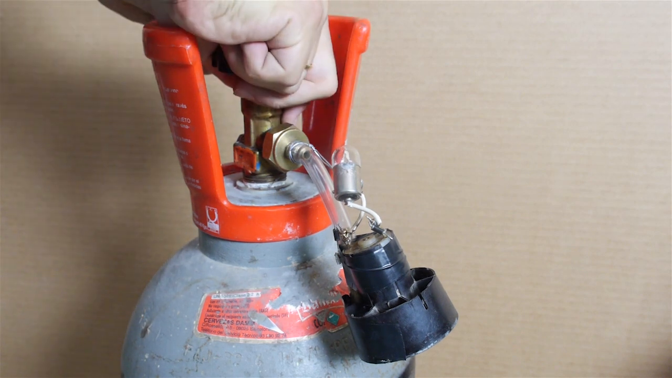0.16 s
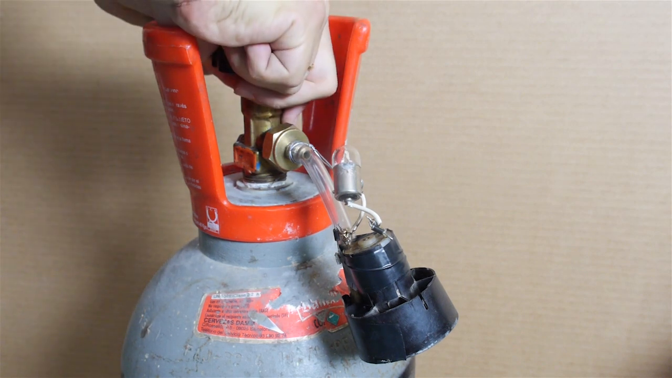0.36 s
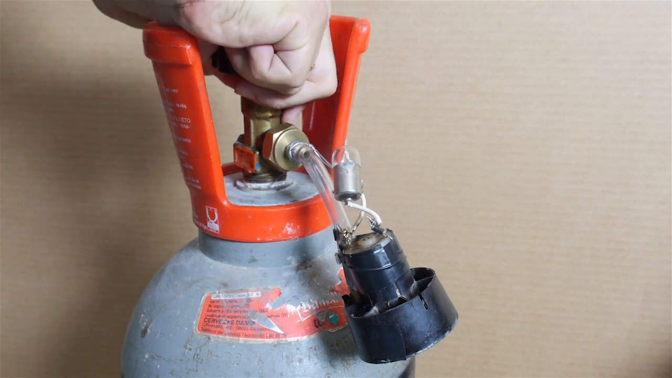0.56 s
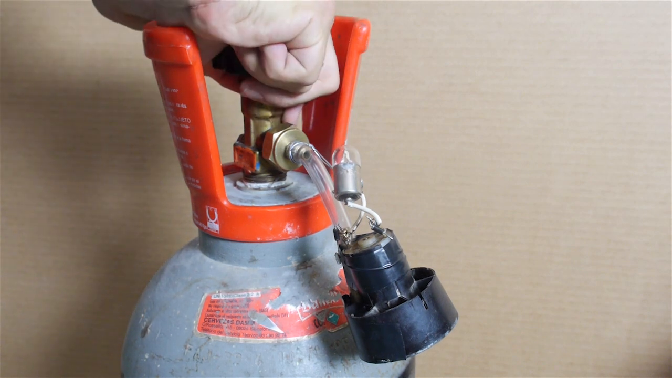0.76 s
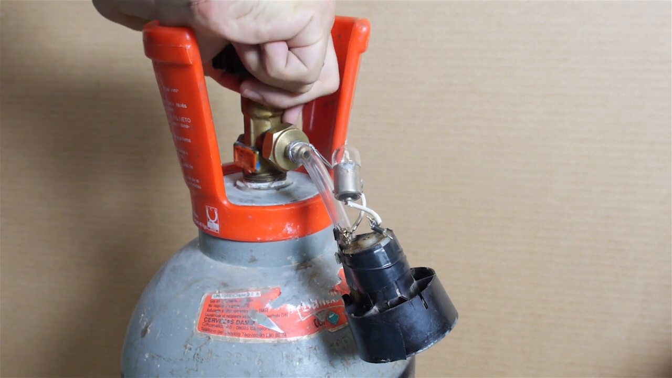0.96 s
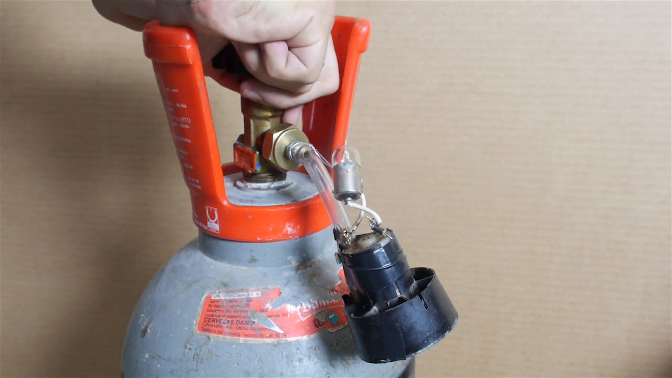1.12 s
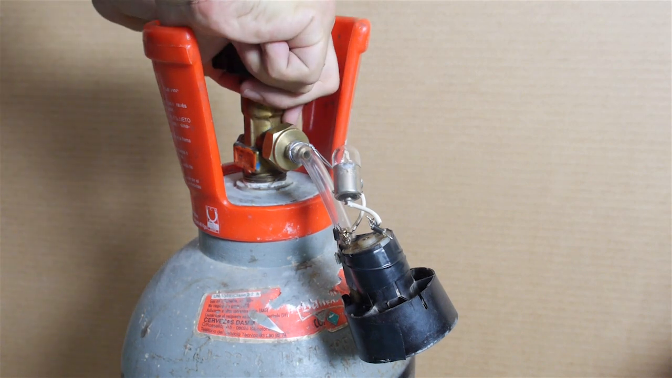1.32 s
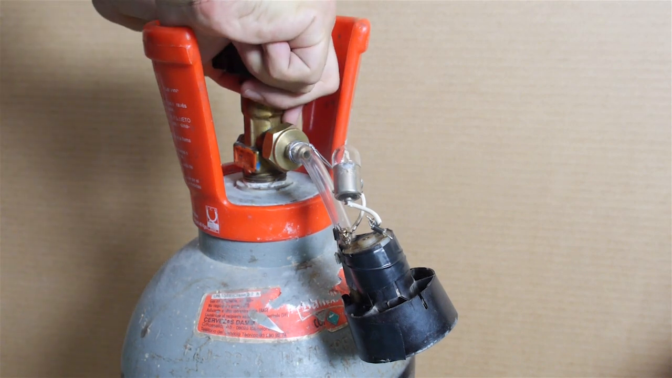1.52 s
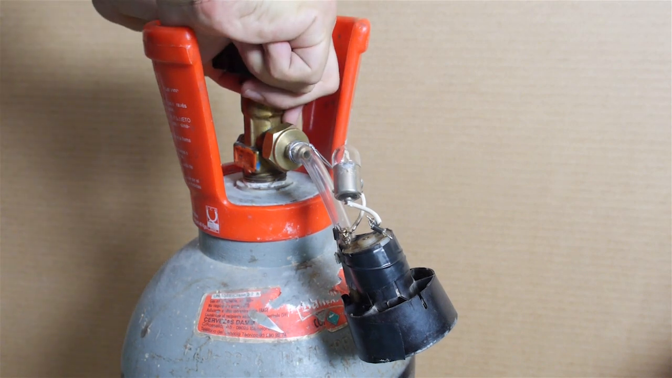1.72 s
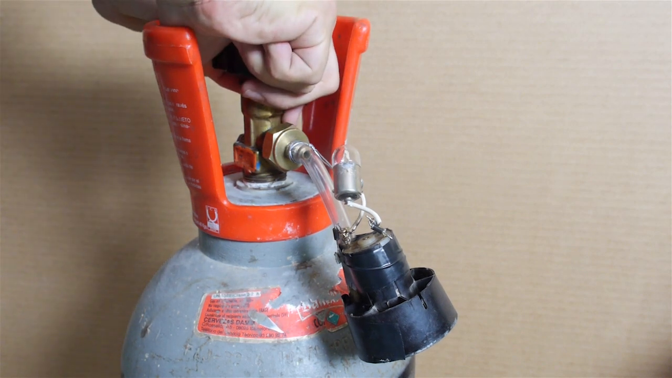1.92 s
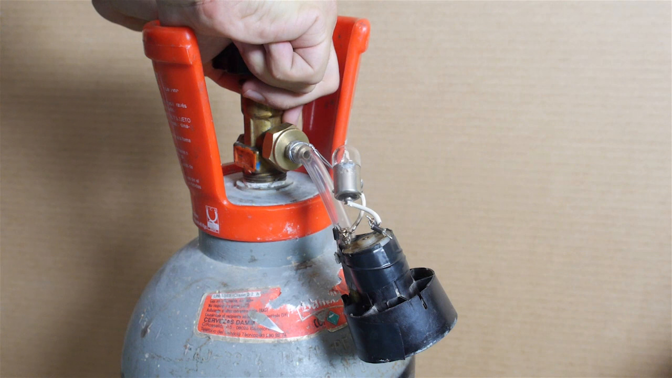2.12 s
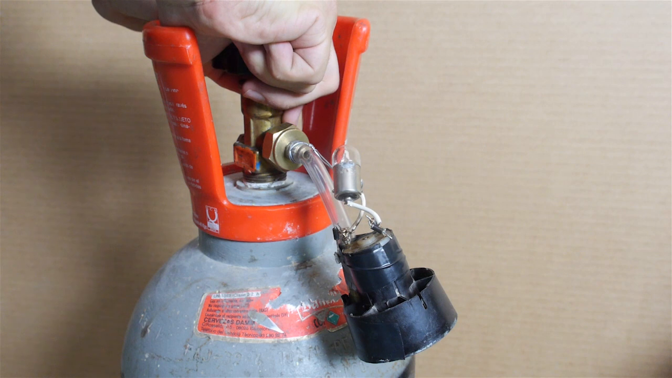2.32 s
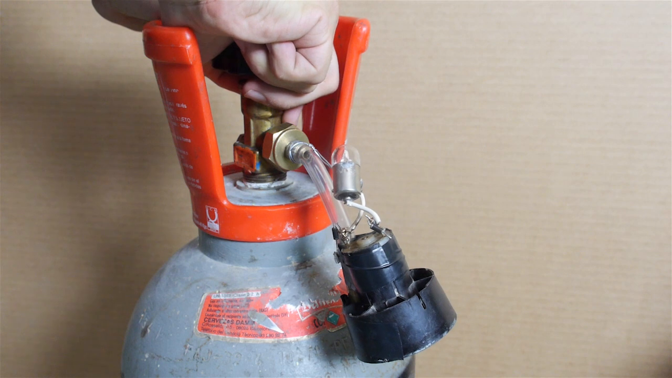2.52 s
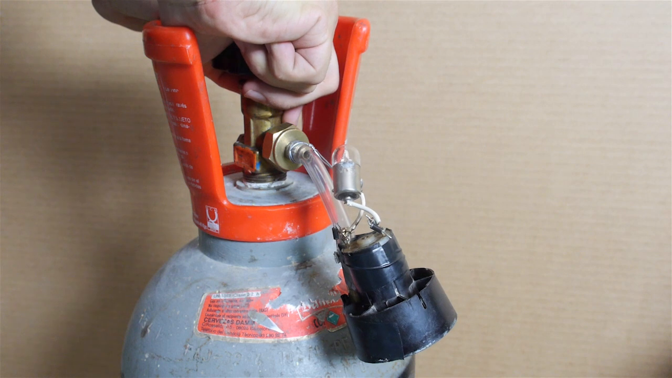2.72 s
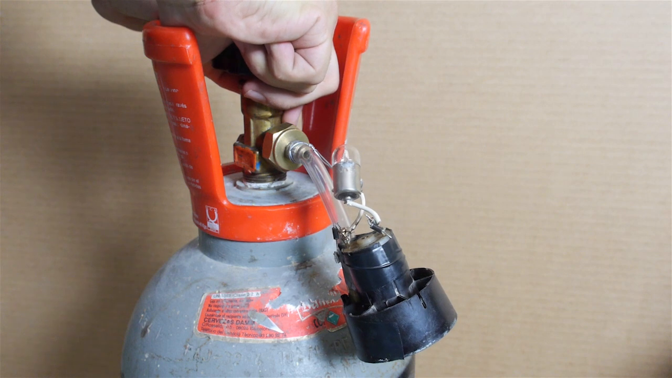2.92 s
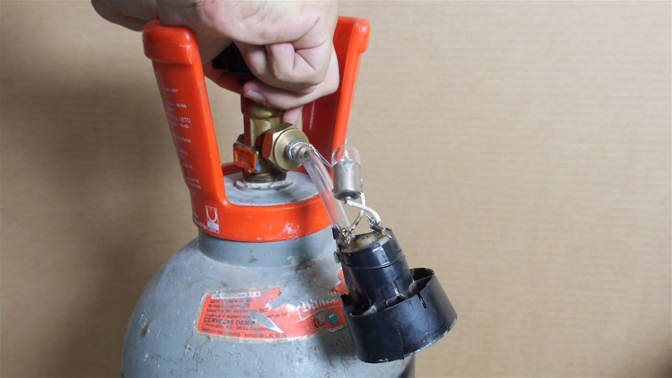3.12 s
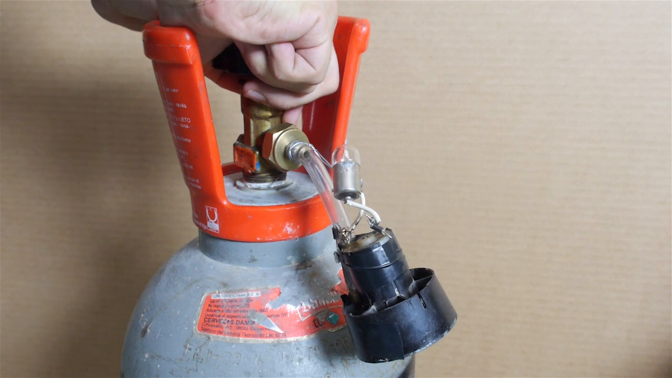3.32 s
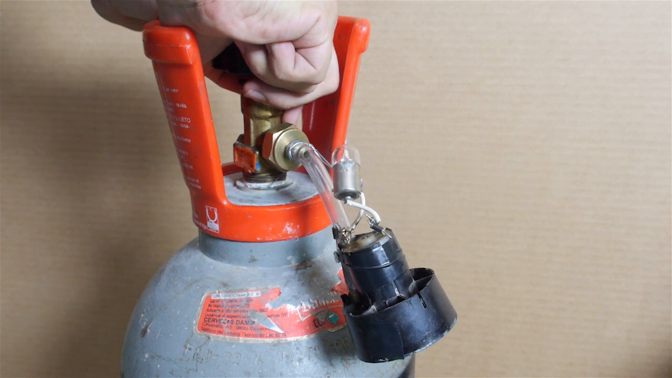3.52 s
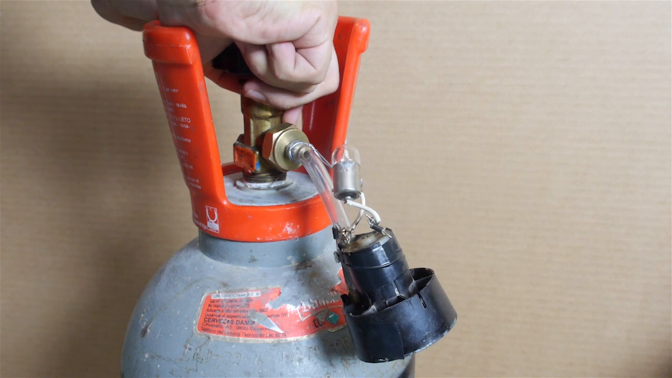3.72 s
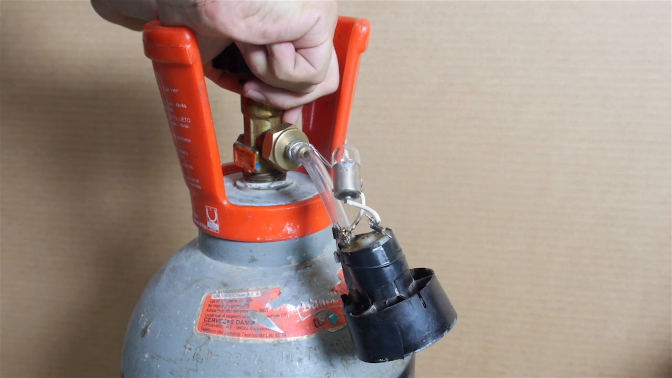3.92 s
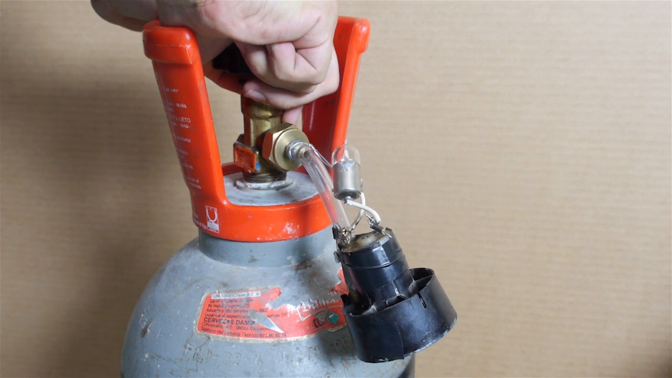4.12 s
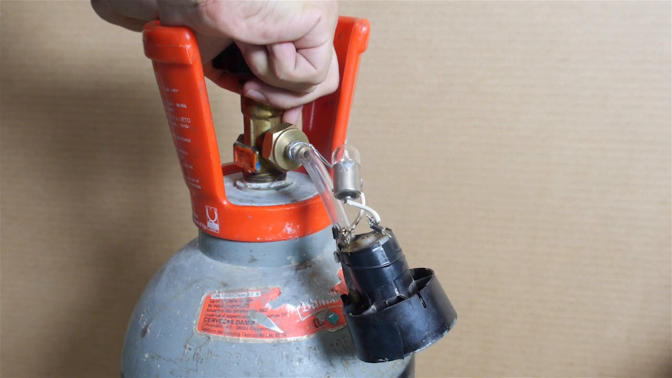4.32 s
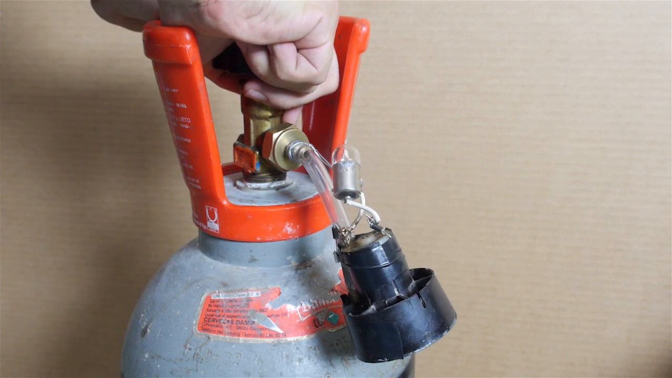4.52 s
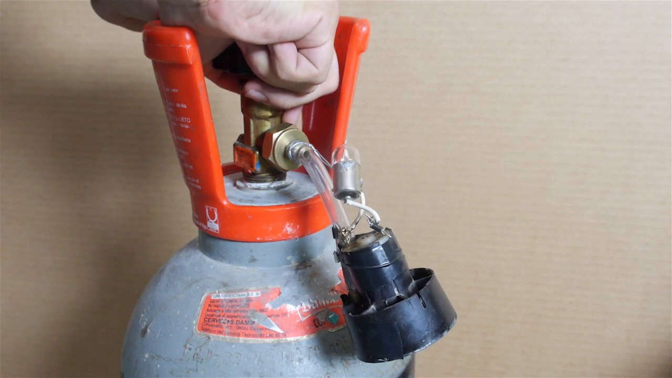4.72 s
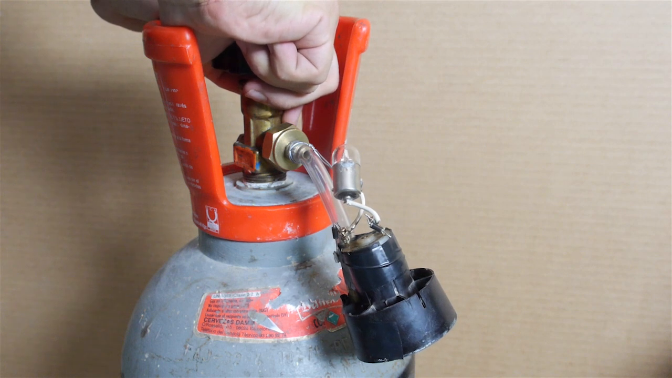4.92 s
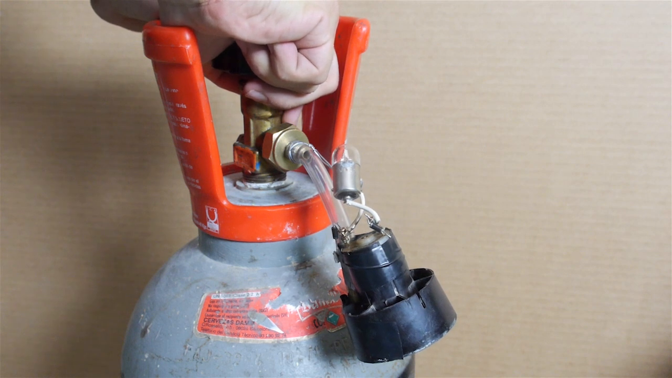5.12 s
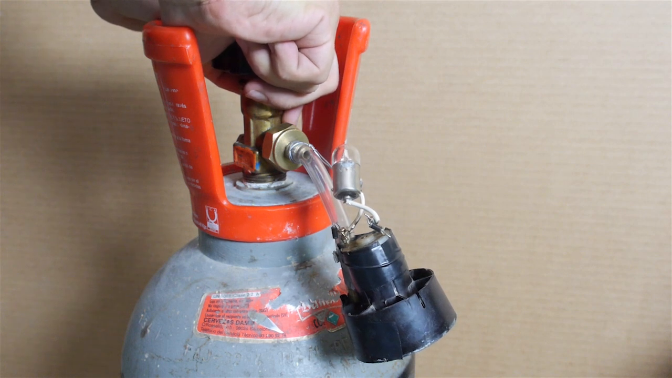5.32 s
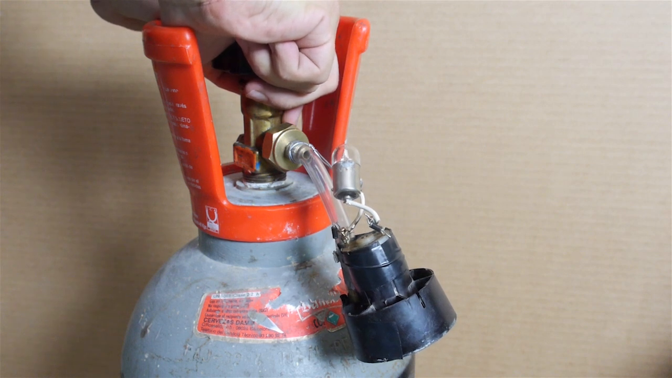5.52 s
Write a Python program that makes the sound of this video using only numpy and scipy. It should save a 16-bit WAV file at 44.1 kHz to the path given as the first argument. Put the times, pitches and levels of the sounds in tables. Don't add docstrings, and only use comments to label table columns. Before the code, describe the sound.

Faint valve ticks in a quiet humming room, then compressed air hisses louder in steps and a small turbine spins up into a climbing whine.

```python
import sys
import numpy as np
from scipy import signal
from scipy.fft import rfft, irfft, next_fast_len
from scipy.io import wavfile
from scipy.ndimage import uniform_filter1d, map_coordinates

SR = 44100
rng = np.random.default_rng(int(sys.argv[2]) if len(sys.argv) > 2 else 0)


def transcribe(u):
    v = np.clip(np.atleast_2d(u).T, -1, 1)
    q = np.round(v * 32767).astype(np.int16)
    wavfile.write(sys.argv[1], SR, q)


def ratio(d):
    e = np.asarray(d, float) / 20
    return 10 ** e


N = 245637

# start in seconds, jet level gained in dB, turn length in seconds.
VALVE_TURNS = [
    (0.79, 4.5, 0.037),
    (1.03, 10.5, 0.057),
    (1.258, 6.5, 0.074),
    (1.538, 8, 0.17),
    (1.723, 4.5, 0.87),
]
# centre in Hz, width in Hz, level in dB.
DUCT_SPINNING_MODES = [(1490, 130, -13), (2190, 410, -10.5), (2844, 690, -5.5), (3467, 480, -6),
                       (3815, 150, -5), (4000, 58, 0.5), (4200, 150, 2.5), (4476, 100, -3.5),
                       (4900, 430, 0), (5440, 63, -20), (5657, 160, -4), (6324, 560, 2), (7110, 160, -1),
                       (7740, 480, -1), (8210, 380, -7.5), (8690, 260, -4), (9380, 240, -5.5),
                       (9870, 700, -4.5), (10580, 220, -12), (11400, 260, -8.5), (12200, 300, -14),
                       (13000, 350, -24), (13800, 170, -35), (16100, 850, -7)]
# centre in Hz, width in Hz, level in dB.
DUCT_STILL_MODES = [(1440, 180, -12.5), (2015, 73, -12.5), (2360, 900, -13.5), (3090, 190, -9.5),
                    (3540, 100, -8.5), (3860, 120, -4), (4055, 30, 1), (4250, 120, -3), (4455, 190, 0),
                    (4860, 130, -2), (4993, 150, -2), (5400, 81, -5), (5730, 370, -7.5), (6150, 270, -2.5),
                    (6690, 400, -5.5), (7020, 120, -7), (7270, 200, -13), (7560, 130, -2.5),
                    (8110, 360, -1), (8650, 210, -3.5), (9260, 91, -2.5), (9700, 300, -9.5),
                    (10200, 270, -5.5), (10900, 130, -6), (11500, 120, -17), (12100, 190, -28),
                    (13500, 530, -36), (16200, 1000, -32)]
# centre in Hz, width in Hz, depth from 0 to 1.
WALL_NOTCHES = [(1758, 160, 0.5), (2446, 170, 0.34), (3067, 160, 0.7), (4560, 40, .8), (5510, 31, 0.7)]
# frequency in Hz, density in dB per Hz.
WASH_SPECTRUM = [(88, -67), (150, -32), (249, -6.5), (374, -11), (481, -6), (1140, 0.5), (1300, -25),
                 (1690, -43), (2860, -120)]
# frequency in Hz, side over mid in dB.
JET_SPREAD = [(60, -33), (110, -28), (200, -23), (380, -15), (700, -9), (1290, -21), (2380, -20),
              (4400, -16), (8120, -11), (15000, -10)]
# start in seconds, blade rate gained in Hz, time constant in seconds.
ROTOR_SURGES = [
    (2.653, 169.85, 0.256),
    (4.456, 600, 4.61),
    (5.263, 60, 0.41),
]
# multiple, level in dB.
BLADE_ORDERS = [(1, 0.0), (2, 2.1), (3, 4.9), (4, 5.8), (5, 4.2), (6, 3.0), (7, 1.4), (8, 1.6), (9, 1.0),
                (10, -1.2), (11, -2.6), (12, -5.2)]
UNEVEN_BLADES_DB = [
    -16,
    -18,
    -19.5,
]
# centre in Hz, width in Hz, level in dB.
HOUSING_MODES = [(156, 58, -8.5), (253, 65, -0.1), (524, 61, -8.0), (613, 111, -3.5), (800, 150, -1.3),
                 (1171, 144, -5.2), (1535, 95, 4.0), (1429, 149, 4.7), (1031, 120, 0.7), (2073, 221, 7.4),
                 (2702, 227, 4.9), (3314, 192, 3.3), (4723, 363, 17.8)]
# centre in Hz, width in Hz, depth from 0 to 1.
FLOOR_NOTCH = (328, 16, .5)
# time in seconds, peak in dB, frequency in Hz.
WHEEL_TICKS = [
    (0.041, -58, 2360),
    (0.05, -46, 1130),
    (0.083, -54, 1170),
    (0.255, -51, 1130),
    (0.288, -57, 931),
    (0.314, -61, 953),
    (0.346, -63, 1110),
    (0.437, -55, 961),
]
# frequency in Hz, rms level in dB.
HUM_TONES = [(177.6, -97), (253.0, -74.5), (344.5, -70.5)]
# frequency in Hz, density in dB per Hz.
ROOM_SPECTRUM = [(20, 2), (45, -6), (120, 0), (170, 1.5), (260, -2), (380, -5.5), (520, -8), (976, -10.5),
                 (1440, -12.5), (2800, -16), (4180, -15.5), (6000, -20.5), (10000, -27), (16000, -32)]
# frequency in Hz, side over mid in dB.
ROOM_SPREAD_DB = [(60, -18), (110, -18), (200, -13), (380, -3), (700, -3), (1290, -3), (2380, -3),
                  (4400, -7), (8120, -5), (15000, -10)]
# full-scale value at rest, value under signal, settling time in seconds.
CONVERTER_OFFSET = (-.00237, -.00322, .3)


def unit(x):
    return x / np.sqrt(np.mean(x ** 2) + 1e-20)


def along(points, hz):
    f, v = np.transpose(points)
    return np.interp(np.log(hz + 1), np.log(f + 1), v)


def ramp(start_s, length_s):
    return np.clip((np.arange(N) / SR - start_s) / length_s, 0, 1)


def since(start_s):
    return np.maximum(np.arange(N) / SR - start_s, 0)


def wobble(rate_hz):
    knots = rng.standard_normal(int(N * rate_hz / SR) + 4)
    return map_coordinates(knots, [np.arange(N) * rate_hz / SR])


def filtered(x, response):
    m = next_fast_len(N + SR // 2)
    return irfft(rfft(x, m) * response(np.fft.rfftfreq(m, 1 / SR)), m)[..., :N]


def masked(x, inside, size):
    hz, t, z = signal.stft(x, SR, nperseg=size)
    return signal.istft(z * inside(hz[:, None], t), SR, nperseg=size)[1][:N]


def mode(f, centre_hz, width_hz):
    return 1j * f * width_hz / (centre_hz ** 2 - f * f + 1j * f * width_hz)


def resonances(modes):
    return lambda f: sum(ratio(db) * mode(f, c, w) for c, w, db in modes)


def notch(f, centre_hz, width_hz, depth):
    return 1 - depth * mode(f, centre_hz, width_hz)


def eddies(patchy_db):
    z = signal.stft(rng.standard_normal((2, N + 512)), nperseg=256)[2]
    field = rng.standard_normal(z.shape[1:])
    field = uniform_filter1d(uniform_filter1d(field, 5, 0), 6, 1)
    return signal.istft(z * ratio(patchy_db * unit(field)), nperseg=256)[1][:, :N]


def pair(noise, colour, spread):
    def response(f):
        return colour(f) * np.array([np.ones(len(f)), ratio(along(spread, f))])

    mid, side = filtered(noise, response)
    return np.array([mid, side]) / np.std(mid)


def jet():
    jet_db = valve()
    opened, spinning = ramp(0.797, 0.0062), ramp(2.5, 0.13)
    fast = 1 / (1 + ratio(12 * (-42 - jet_db)))
    fine_slow_db, fine_fast_db, fine_spun_db = -9, -3, 1.6
    fine_db = fine_slow_db + (fine_fast_db - fine_slow_db) * fast + fine_spun_db * spinning
    roar_db = -11.5 + 4 * np.clip((-43 - jet_db) / 10, 0, 1)
    wash_db = -52.5 + (jet_db + 25) - 2 * spinning + 3 * slip()
    airy_db = 0.41 * np.minimum(jet_db + 29, 0)

    noise = eddies(patchy_db=0.0) * ratio(0.59 * wobble(150) + 0.32 * wobble(12))
    walls = early(delay_s=0.02, echo_db=-22)
    noise = filtered(noise, lambda f: walls(f) * cancel(f))

    def above(f, hz):
        return 1 / (1 + (hz / (f + 1)) ** 16)

    def through(duct):
        roar = pair(noise, lambda f: duct(f) * above(f, 1214) * (1 - above(f, 3270)), JET_SPREAD)
        core = pair(noise, lambda f: duct(f) * above(f, 3120) * (1 - above(f, 5940)), JET_SPREAD)
        fine = pair(noise, lambda f: duct(f) * above(f, 5940), JET_SPREAD)
        fine = fine + (ratio(airy_db) - 1) * filtered(fine, lambda f: above(f, 12300))
        return core + ratio(fine_db + 0.5) * fine + ratio(roar_db) * roar

    hiss = spinning * through(leaky(DUCT_SPINNING_MODES))
    hiss = hiss + (1 - spinning) * through(leaky(DUCT_STILL_MODES))
    wash = pair(eddies(patchy_db=0.5), lambda f: ratio(along(WASH_SPECTRUM, f)), JET_SPREAD)
    return opened * (ratio(jet_db) * hiss + ratio(wash_db) * wash)


def valve():
    crack_db, freed_db, sag_db_per_s = -58.5, -2, -0.27
    turned_db = sum(db * ramp(s, length_s) for s, db, length_s in VALVE_TURNS)
    sag_db = sag_db_per_s * since(ROTOR_SURGES[0][0])
    return crack_db + turned_db + freed_db * ramp(2.59, 0.062) + sag_db


def leaky(modes):
    scatter_db = -11
    grid_hz = np.arange(0, SR / 2, 4.)
    power = sum(abs(resonances([one])(grid_hz)) ** 2 for one in modes)
    gain = np.sqrt(abs(resonances(modes)(grid_hz)) ** 2 + ratio(scatter_db) ** 2 * power)
    return lambda f: np.interp(f, grid_hz, gain)


def early(delay_s, echo_db):
    draw = rng.random((12, 2))

    def echo(f, u, v):
        return ratio(echo_db - 9.7 * u) * np.sign(v - 0.5) * np.exp(-2j * np.pi * f * delay_s * (0.1 + u))

    return lambda f: 1 + sum(echo(f, u, v) for u, v in draw)


def cancel(f):
    return np.prod([notch(f, *row) for row in WALL_NOTCHES], axis=0)


def turbine():
    push_db, slip_db, cruise_hz, blade_count = -55.5, 2, 180, 7
    blade_hz = rotor()
    whine_db = push_db + slip_db * slip()
    blades = np.cumsum(blade_hz * (1 + 0.0007 * wobble(40))) / SR
    octaves = np.log2(blade_hz / cruise_hz)
    first, upper = 0, 0
    for k, db in BLADE_ORDERS:
        level = ratio(db + (6.3 + 1.13 * k) * octaves + 0.9 * wobble(14))
        line = level * np.exp(2j * np.pi * (k * blades + 0.15 * rng.random()))
        if k == 1:
            first = line
        else:
            upper = upper + line
    uneven = 0
    for m, db in enumerate(UNEVEN_BLADES_DB):
        turns = (m + 1) * blades / blade_count + rng.random()
        uneven = uneven + ratio(db + 3 * wobble(9)) * np.exp(2j * np.pi * turns)
    tones = (first * (1 + uneven) + upper * np.exp(2j * uneven.real)).real

    def housing(f):
        return notch(f, *FLOOR_NOTCH) * resonances(HOUSING_MODES)(f) / (1 + (125 / (f + 1)) ** 6)

    return filtered(ramp(2.76, 0.09) * ratio(whine_db) * tones, housing)


def rotor():
    creep_hz_per_s = 7.63
    surges_hz = sum(hz * (1 - np.exp(-since(s) / tau_s)) for s, hz, tau_s in ROTOR_SURGES)
    return 1 + creep_hz_per_s * since(ROTOR_SURGES[0][0]) + surges_hz


def slip():
    lag_s = 0.076
    blade_hz = rotor()
    gain_hz_per_s = uniform_filter1d(np.gradient(blade_hz) * SR, int(lag_s * SR))
    return ramp(2.72, 0.13) * np.sqrt(abs(gain_hz_per_s / blade_hz))


def wheel():
    t60_s, snap_t60_s, attack_s, upper_ratio, upper_db = 0.0078, 0.0021, 0.00036, 1.36, -9
    out, t = np.zeros(N), np.arange(SR // 50) / SR
    for s, db, hz in WHEEL_TICKS:
        snap = 0.12 * ratio(-60 * t / snap_t60_s) * rng.standard_normal(len(t))
        modes = np.sin(2 * np.pi * hz * t) + ratio(upper_db) * np.sin(2 * np.pi * upper_ratio * hz * t)
        ring = ratio(-60 * t / t60_s) * modes * (1 - np.exp(-t / attack_s))
        out[round((s + 0.001) * SR):][:len(t)] += ratio(db + 3.5) * (ring + snap)
    return out


def room():
    room_db, whistle_hz, whistle_width_hz, whistle_db = -67, 4120, 150, 4.5
    t = np.arange(N) / SR
    hum = 0
    for hz, db in HUM_TONES:
        tone = np.sin(2 * np.pi * (hz * t + 0.035 * wobble(10)))
        hum = hum + ratio(db + 4.5 + 1.4 * wobble(10)) * tone
    duck = ratio(-8 * ramp(2.3, 0.4))

    def colour(f):
        whistle = whistle_db * np.exp(-((f - whistle_hz) / whistle_width_hz) ** 2)
        return ratio(along(ROOM_SPECTRUM, f) + whistle)

    floor = ratio(room_db) * pair(eddies(patchy_db=0.5), colour, ROOM_SPREAD_DB)
    return floor + duck * hum * ratio([[0], [-20]])


def scene():
    jet_pan = -0.05
    air = jet()
    mid, side = air + room() + (turbine() + wheel()) * ratio([[0], [-14]])
    side = side + jet_pan * air[0]
    return np.array([mid + side, mid - side])


def top_cut(x):
    return signal.sosfilt(signal.butter(12, 16510, fs=SR, output="sos"), x)


def record(dry):
    top_hz = 15740
    heard = filtered(dry, lambda f: np.clip((top_hz - f) / 60, 0, 1))
    rest, busy, settle_s = CONVERTER_OFFSET
    mix = heard + rest + (busy - rest) * ramp(VALVE_TURNS[0][0], settle_s)
    return top_cut(mix)


dry = scene()
out = record(dry)
transcribe(out)
```